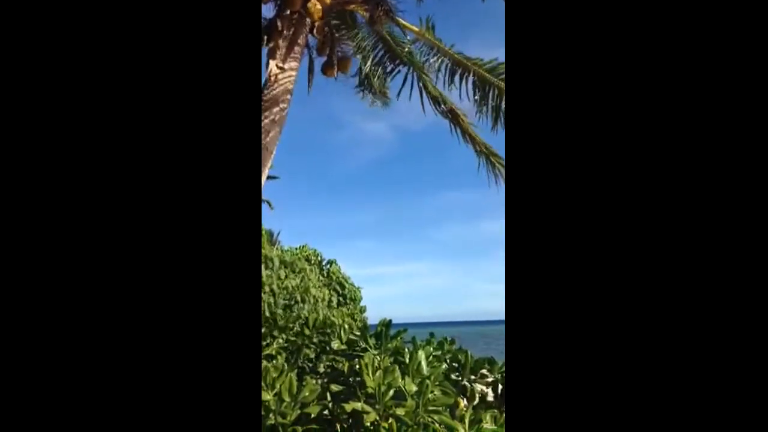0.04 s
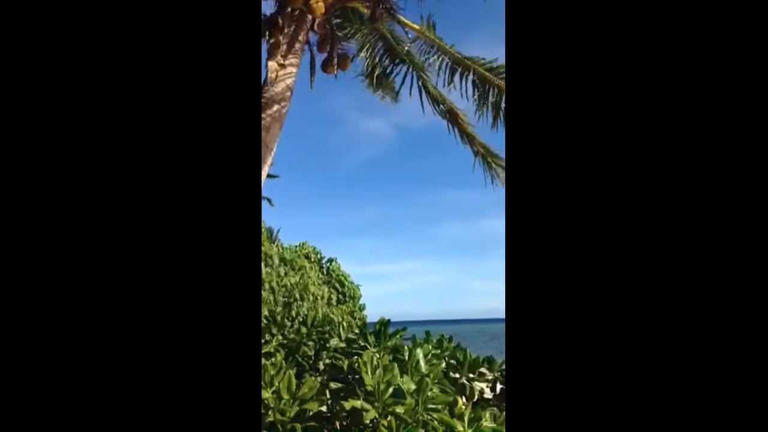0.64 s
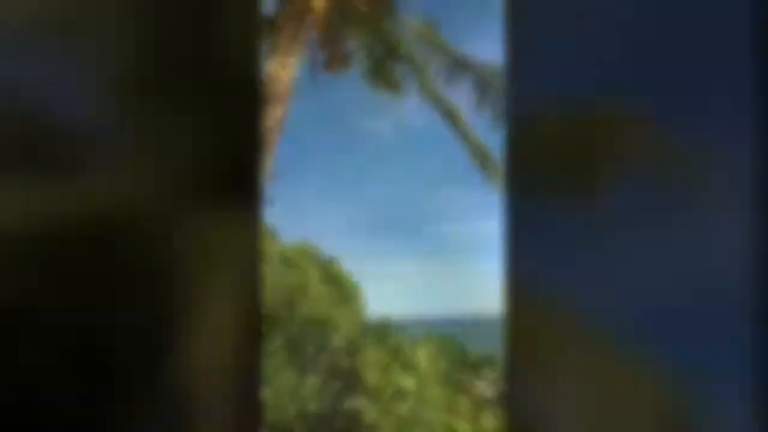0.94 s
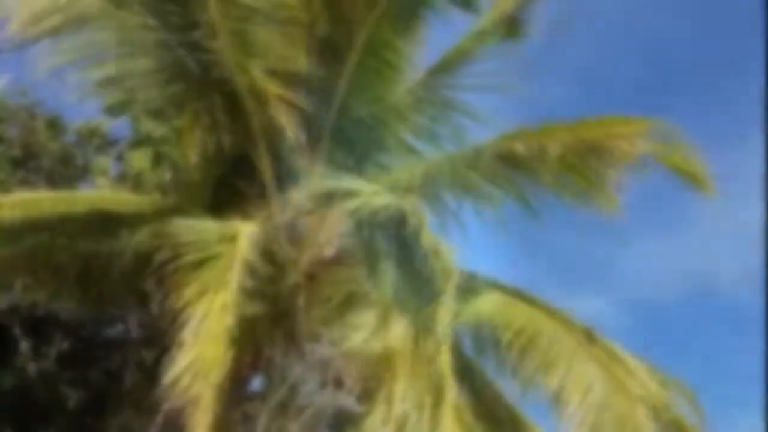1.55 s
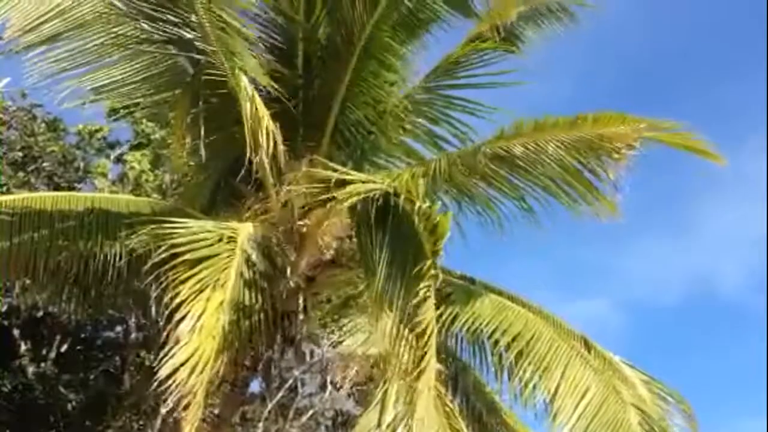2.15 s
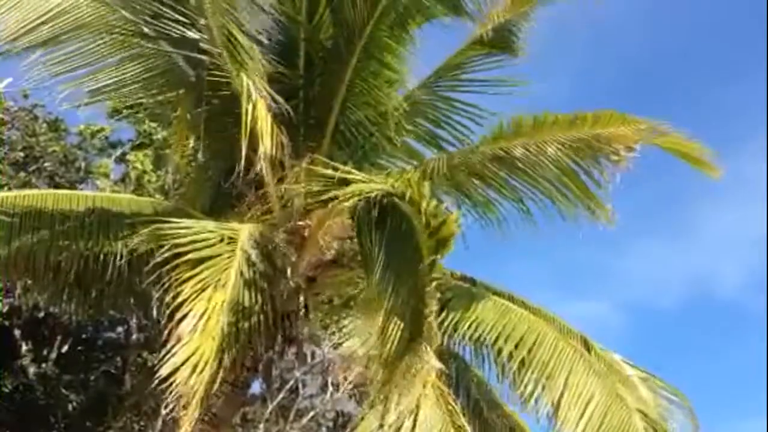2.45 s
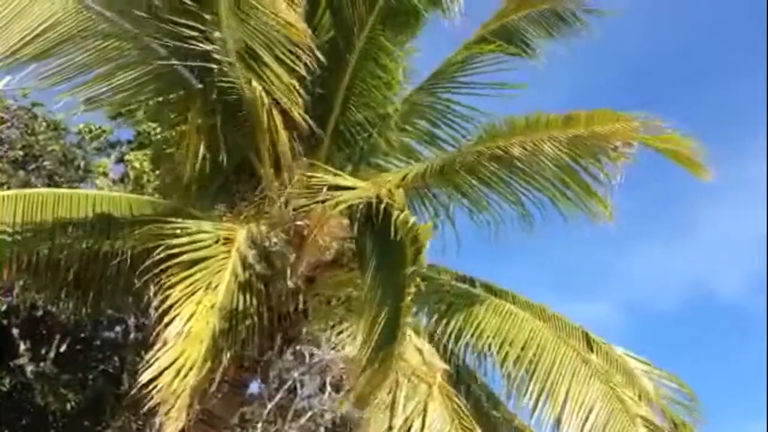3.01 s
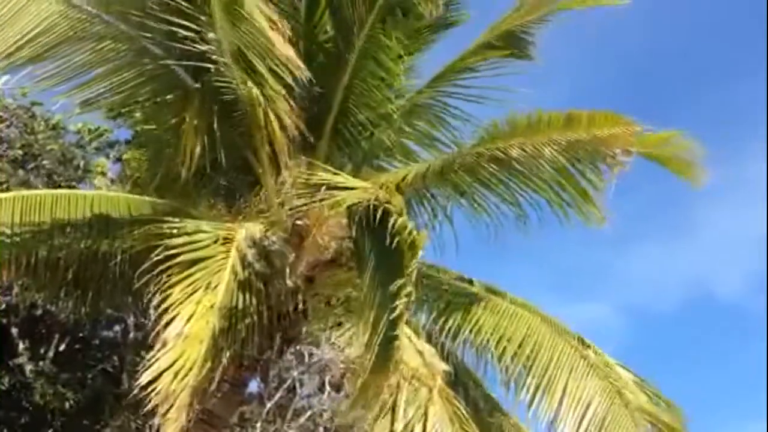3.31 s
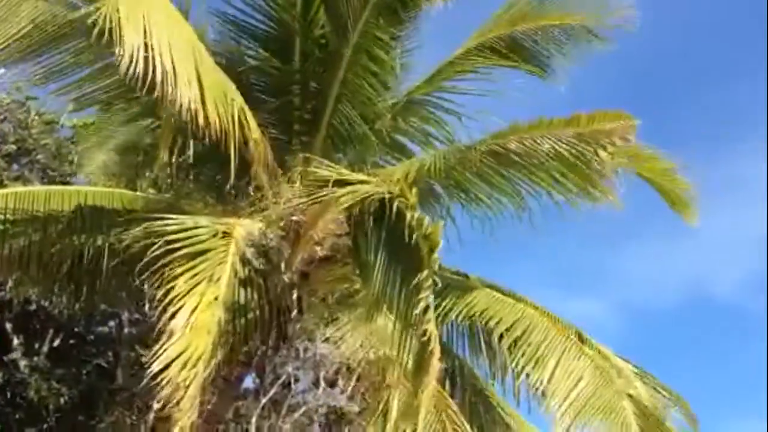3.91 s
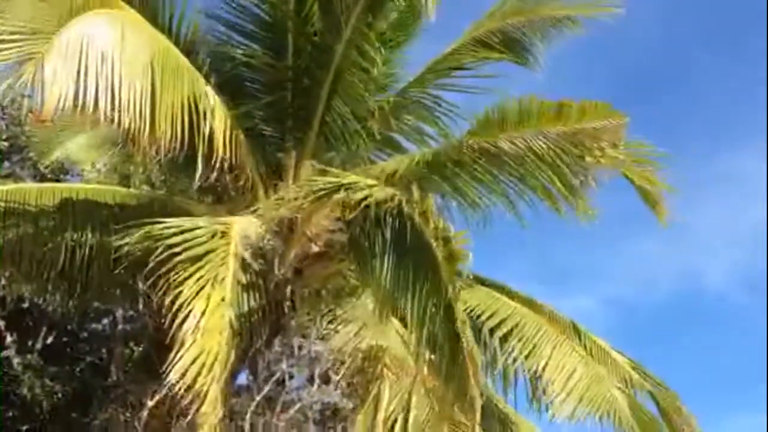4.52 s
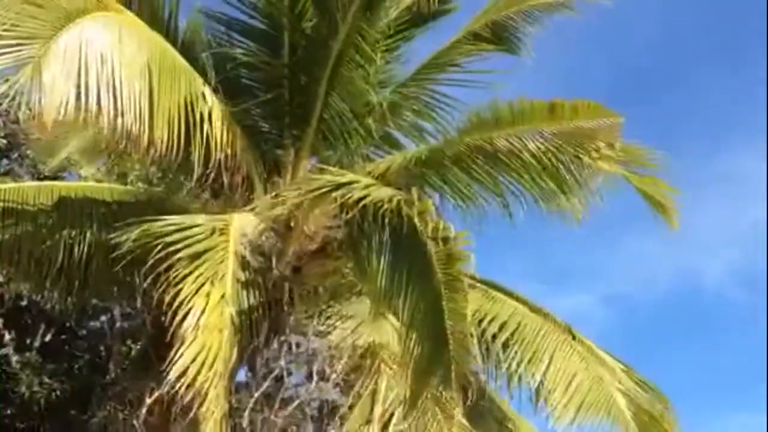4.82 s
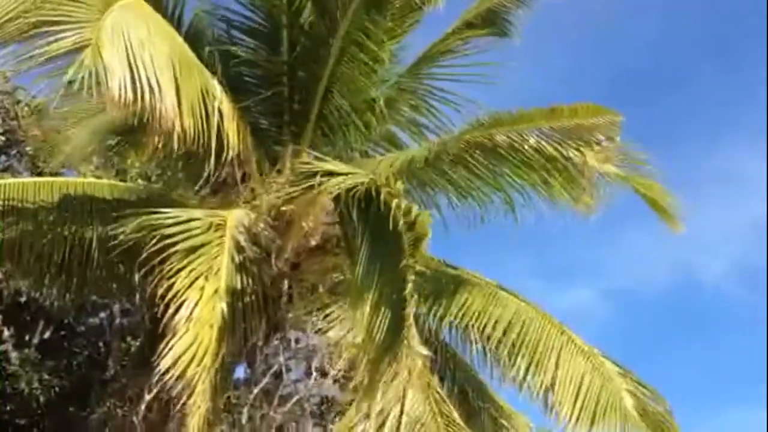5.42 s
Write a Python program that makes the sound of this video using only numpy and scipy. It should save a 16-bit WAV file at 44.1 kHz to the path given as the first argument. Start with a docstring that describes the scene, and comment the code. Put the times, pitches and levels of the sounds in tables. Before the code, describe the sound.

Wind rumbles and thumps on the microphone at a shore, over washing waves and lightly ticking palm leaves.

```python
"""Wind on a microphone at a tropical shore: eddies rumble throughout, and a gust hits hard near the end.
Each turbulent eddy that passes the port is heard as a fluctuation of pressure.
Behind the wind, a bright wash of waves and blown bushes fades into a quieter spot under a palm.
There distant surf roars softly, countless splashes summing to noise, while the fronds rustle
and their stiff leaflets tick together in brief impacts."""
import sys
import numpy as np
from scipy import signal
from scipy.fft import rfft, irfft, next_fast_len
from scipy.io import wavfile
from scipy.ndimage import uniform_filter1d

SR = 44100
rng = np.random.default_rng(int(sys.argv[2]) if len(sys.argv) > 2 else 0)


def unload_audio(sound):
    """Save the sound as a 16-bit wav file, at the path given as the first command line argument."""
    columns = np.transpose(np.atleast_2d(sound))
    # keep every value between -1 and 1, then stretch to whole-number steps
    steps = np.round(np.clip(columns, -1, 1) * 32767)
    wavfile.write(sys.argv[1], SR, steps.astype(np.int16))


N = 245195
TIME, FREQS = np.arange(N) / SR, np.fft.rfftfreq(N, 1 / SR)

# crossfade from the open shore to the palm: (time [s], shore gain [ratio], palm gain [ratio])
PLACE_GAINS = [(0, 1.11, 0.083), (.2, 1.16, 0.071), (.5, 1.19, 0.0058), (.8, 1.12, 0.98),
               (1.05, 0.84, 0.42), (1.3, 0.55, 0.62), (1.5, 0.036, 0.78), (5.56, 0.09, 0.7)]
# rustle of the fronds as the wind sways them: (time [s], level [dB])
FROND_SWAY = [(0, -87), (1.25, -63.5), (1.6, -72.5), (2.45, -70.5), (2.95, -66.5), (3.45, -63.3),
              (3.9, -72.5), (4.3, -68), (5.1, -72.5), (5.56, -74)]


def gain_of(db):
    """Amplitude ratio of a level in decibels."""
    return 10 ** (np.asarray(db) / 20)


def unit_rms(x):
    """Normalisation to an rms of 1."""
    return x / np.sqrt(np.mean(x ** 2) + 1e-30)


def level_at(spectrum, hz):
    """Linear interpolation of a spectrum on a logarithmic frequency axis."""
    frequencies, levels = np.transpose(spectrum)
    return np.interp(np.log(hz + 1), np.log(frequencies + 1), levels)


def curves(rows, t):
    """Linear interpolation of each column of a time table at the times t."""
    times, *columns = np.transpose(rows)
    return [np.interp(t, times, column) for column in columns]


def colour(x, spectrum):
    """Zero-phase filtering by multiplication in the frequency domain."""
    size = next_fast_len(N + 4096, real=True)
    response = gain_of(level_at(spectrum, np.fft.rfftfreq(size, 1 / SR)))
    return irfft(rfft(x, size) * response, size)[:N]


def wander(rate_hz, size=2048):
    """Random modulation: noise of rms 1, low-passed at the given rate."""
    hz = np.fft.rfftfreq(size, N / SR / size)
    slow = irfft(rfft(rng.standard_normal(size)) * (hz > 0) / (1 + (hz / rate_hz) ** 4))
    return unit_rms(np.interp(TIME, np.linspace(0, N / SR, size), slow))


def add(mix, start_s, sound):
    """Superposition of a sound on the mix from a given time."""
    part = mix[max(round(start_s * SR), 0):][:len(sound)]
    part += sound[:len(part)]


def wash(spectrum, roar_db, foam_db, split_hz=900, foam_hz=3500):
    """Incoherent summation: countless splashes merge into patchy noise, with a low roar and foam above."""
    # unevenness of the wash: (frequency [Hz], rms level deviation [dB])
    patch_depth = [(100, 3), (500, 1.5), (2000, 2.34), (5000, 2.1), (15000, -0.5)]
    hz, _, cells = signal.stft(rng.standard_normal(N), SR, nperseg=1024, noverlap=768)
    patches = uniform_filter1d(rng.standard_normal(cells.shape), size=5, axis=0)  # across frequency
    patches = unit_rms(uniform_filter1d(patches, size=7, axis=1))  # across time
    cells *= gain_of(level_at(spectrum, hz)[:, None] + level_at(patch_depth, hz)[:, None] * patches)
    noise = unit_rms(signal.istft(cells, SR, nperseg=1024, noverlap=768)[1][:N])
    roar = irfft(rfft(noise) / (1 + (FREQS / split_hz) ** 4), N)
    foam = irfft(rfft(noise - roar) * np.exp(-(FREQS / foam_hz) ** 2), N)
    return noise + roar * (gain_of(roar_db) - 1) + foam * (gain_of(foam_db) - 1)


def sea(shore_db=-47.5, surf_db=-56):
    """Broadband noise of breaking waves: the near, bright shore crossfades into dull, distant surf."""
    # wash on the open shore: (frequency [Hz], relative spectral density [dB])
    shore_spectrum = [(90, 3.5), (160, -13), (250, -1), (360, 0.5), (480, -4.5), (780, -8), (1100, -11.5),
                      (2300, -13), (3000, -12.5), (5000, -14), (8300, -20), (11500, -25), (15400, -30.5)]
    # distant surf under the palm: (frequency [Hz], relative spectral density [dB])
    surf_spectrum = [(90, -20), (160, -9), (300, -6), (410, -6), (500, -9), (700, -13.5), (950, -18.5),
                     (1500, -18.5), (2300, -20), (3000, -21), (4300, -22.5), (9300, -29), (15400, -32.5)]
    # swell of the distant breakers: (time [s], roar gain [dB], foam gain [dB])
    swell = [(0, -16, 0), (1.6, 6.5, 3), (2.2, 6, 2), (2.7, 6.5, 3), (3.3, 5, 5.5), (3.8, 7, 1.5),
             (4.1, 6, 3.5), (4.5, 3.5, 5.5), (4.9, 7, 5.5), (5.56, 4.5, 3.5)]
    shore_gain, palm_gain = curves(PLACE_GAINS, TIME)
    roar_db, foam_db = curves(swell, TIME)
    shore = wash(shore_spectrum, roar_db=0.42 * wander(8.9), foam_db=0.5 * wander(15))
    shore *= gain_of(0.22 * wander(40))
    surf = wash(surf_spectrum, roar_db, foam_db + 0.42 * wander(25))
    return gain_of(shore_db) * shore_gain * shore + gain_of(surf_db) * palm_gain * surf


def rustle(spectrum, flutter_db, ticks_per_s=1100, spread_db=3.5, bands=8):
    """Impact excitation: each random touch rings a leaf for a few cycles; far leaves blur into hiss."""
    t, ticks = np.arange(256) / SR, np.zeros(N)
    for hz in np.geomspace(1500, 13000, bands):
        touches = (rng.random(N) < ticks_per_s / bands / SR) * rng.choice([-1, 1], N)
        strengths = gain_of(spread_db * np.minimum(rng.exponential(1, N), 3.5))
        ring = np.exp(-t * hz / 1.3) * np.sin(2 * np.pi * hz * t) * hz ** 0.72
        ticks += signal.oaconvolve(touches * strengths, ring)[:N]
    leaves = colour(unit_rms(ticks) + rng.standard_normal(N), spectrum)
    return unit_rms(leaves * gain_of(flutter_db * wander(21)))


def bushes(level_db=-61):
    """Flow-induced flutter: bushes on the open shore rustle brightly and fade with it."""
    # bush leaves: (frequency [Hz], relative spectral density [dB])
    bush_spectrum = [(1500, -25), (3500, -6.5), (6000, 0), (8500, 0.5), (11000, -10.5), (15000, -10)]
    shore_gain, _ = curves(PLACE_GAINS, TIME)
    return gain_of(level_db) * shore_gain * rustle(bush_spectrum, flutter_db=4.5)


def fronds(swing_db=2.5, swing_hz=4):
    """Amplitude modulation: the palm's rustle swells and sinks as the wind bends its fronds."""
    # palm leaflets: (frequency [Hz], relative spectral density [dB])
    leaflet_spectrum = [(1200, -12), (2200, -9.5), (3000, 2.5), (3700, 2.5), (4600, -6), (6000, -6),
                        (9000, -13), (15000, -20)]
    sway_db, = curves(FROND_SWAY, TIME)
    return gain_of(sway_db + swing_db * wander(swing_hz)) * rustle(leaflet_spectrum, flutter_db=1.8)


def light_slaps(per_s=4.3, offset_db=-0.5, spread_db=5, low_hz=3300, high_hz=7000):
    """A random point process of leaflet impacts, whose levels follow the sway of the fronds."""
    when, strength, pitch = rng.random((round(per_s * N / SR), 3)).T
    times = when * N / SR
    sway_db, = curves(FROND_SWAY, times)
    levels = sway_db + offset_db + spread_db * (2 * strength - 1)
    return list(zip(times, levels, low_hz * (high_hz / low_hz) ** pitch))


def slaps(rise_s=0.002, decay_s=0.0096, half_width_octaves=0.4, size=4096):
    """Impact noise: a leaflet hits its neighbours in a short spray of contacts, filtered to its band."""
    # hardest slaps of stiff leaflets: (time [s], level [dB], centre frequency [Hz])
    hard_slaps = [(.122, -56, 11000), (.155, -49.5, 6500), (.224, -50.5, 5860), (.46, -54, 6000),
                  (1.258, -54.5, 6500), (2.606, -60, 4800), (2.9, -58, 3700), (3.044, -55.5, 3880),
                  (3.719, -55, 3830)]
    out, t, hz = np.zeros(N), np.arange(size) / SR, np.fft.rfftfreq(size, 1 / SR)
    envelope = (1 - np.exp(-t / rise_s)) * np.exp(-t / decay_s)
    for start_s, db, centre_hz in hard_slaps + light_slaps():
        contacts = rng.standard_normal(size) * (rng.random(size) < 0.15)
        band = 1 / (1 + (np.log2((hz + 1) / centre_hz) / half_width_octaves) ** 2)
        spray = unit_rms(irfft(rfft(contacts) * band))
        add(out, start_s, gain_of(db) * spray * envelope / envelope.max())
    return out


def breeze(lump_db=3, lump_hz=12):
    """Turbulent pressure fluctuation: light air flow makes a lumpy rumble at the microphone port."""
    # rumble of the air flow, with a long lull before the gust: (time [s], level [dB])
    flow_levels = [(0, -54.5), (.4, -54.5), (.88, -48.5), (1.1, -57.5), (1.9, -56.5), (2.4, -62),
                   (3.7, -62), (4.65, -59), (4.95, -44.5), (5.56, -51)]
    # turbulent pressure: (frequency [Hz], relative spectral density [dB])
    rumble_spectrum = [(15, -19), (30, -5), (55, -0.5), (80, -1.5), (130, -3), (200, -8), (320, -18.5),
                       (700, -35), (2000, -94)]
    level_db, = curves(flow_levels, TIME)
    lumps = gain_of(lump_db * wander(lump_hz))
    return gain_of(level_db) * unit_rms(colour(rng.standard_normal(N), rumble_spectrum) * lumps)


def eddy_spectrum(hz, eddy_hz, port_hz=760):
    """Spatial averaging: swirls smaller than the port cancel across it, so a broad hump loses treble."""
    ratio = hz / eddy_hz
    hump = ratio ** 0.86 * np.exp(-1.226 * ratio ** 1.086)
    return hump * np.exp(-(hz / port_hz) ** 2.3 / 2)


def wakes(strikes, delay_s=0.01595, offset_db=-11, spread_db=1, length_s=0.033, eddy_hz=89):
    """Wake formation: a weak, slow eddy trails each buffet."""
    jitter = rng.uniform(-0.92, 1, (len(strikes), 2))
    return [(s + delay_s * (1 + 0.29 * lag), db + offset_db + spread_db * strength, length_s, eddy_hz)
            for (s, db, _, _), (lag, strength) in zip(strikes, jitter)]


def buffets(overlap=1.87, kick_gain=0.51, sharpen_per_db=0.011, calm_db=-40, trim_db=-0.93, size=8192):
    """Pressure transients: each eddy is one kick amid uneven swings; small, fast eddies sound higher."""
    # eddies striking the microphone:
    # (middle time [s], level [dB], nominal duration [s], characteristic frequency [Hz])
    strikes = [(.589, -41, 0.029, 77), (.66, -42, 0.062, 80), (0.823, -34.5, 0.055, 135),
               (0.921, -37, 0.043, 110), (1.298, -47.5, 0.025, 105), (1.56, -46, 0.026, 101),
               (1.908, -44.5, 0.017, 126), (3.208, -49, .054, 134), (3.397, -42.5, .012, 136),
               (4.183, -28, 0.024, 124), (4.214, -27.5, 0.021, 215), (4.241, -25, .026, 127),
               (4.267, -20, 0.011, 288), (4.278, -18.5, 0.0089, 186), (4.293, -26.5, 0.015, 346),
               (4.479, -45, 0.033, 120), (4.566, -37, .028, 100), (4.735, -31.5, 0.03, 121),
               (4.899, -28.5, 0.019, 90), (4.991, -38.5, 0.047, 115), (5.033, -35, 0.014, 124),
               (5.101, -28, 0.027, 205), (5.209, -30, 0.031, 159), (5.257, -25, 0.014, 152),
               (5.288, -28.5, 0.033, 142), (5.348, -24, 0.031, 137), (5.408, -24.5, 0.025, 190),
               (5.539, -39, 0.022, 99)]
    out, t, hz = np.zeros(N), (np.arange(size) - size / 2) / SR, np.fft.rfftfreq(size, 1 / SR)
    for middle_s, db, length_s, eddy_hz in strikes + wakes(strikes):
        window = np.cos(np.pi * np.clip(t / (overlap * length_s), -0.5, 0.5)) ** 2
        # gentle eddies swing smoothly, in a narrower band; hard ones break up
        narrowing = 1 + np.clip(0.5 - (db - calm_db) / 25, 0, 1)
        random_phases = np.exp(2j * np.pi * rng.random(len(hz)))
        swirl = irfft(eddy_spectrum(hz, eddy_hz) ** narrowing * random_phases)
        # the kick's components arrive together; the harder the blow, the steeper its front
        kick_hz = eddy_hz * np.exp(sharpen_per_db * (db - calm_db))
        common_phase = np.exp(2j * np.pi * rng.random())
        kick = np.fft.fftshift(irfft(eddy_spectrum(hz, kick_hz) ** narrowing * common_phase))
        eddy = unit_rms(window * swirl) + kick_gain * unit_rms(window * kick)
        eddy *= np.sqrt(length_s * SR / np.sum(eddy ** 2))  # energy in proportion to duration
        add(out, middle_s + t[0], gain_of(db + trim_db) * eddy)
    return out


def scene():
    """Superposition of sea, leaves and wind at one microphone."""
    return (sea() + bushes() + fronds() + slaps() + breeze() + buffets())[None]


def record(dry, cutoff_hz=15480):
    """Frequency response: the microphone has a shallow notch and sheds the deepest bass and top treble."""
    # microphone response: (frequency [Hz], gain [dB])
    mic_response = [(10, -18), (28, -13.5), (50, 1.5), (2300, -0.5), (2480, -1), (2700, -5), (3050, -4.5),
                    (3350, -2.5), (4000, -1.5), (16000, 0)]
    low_pass = signal.firwin(1023, cutoff_hz, window=("kaiser", 9), fs=SR)
    return signal.oaconvolve(colour(dry[0], mic_response), low_pass, "same")[None]


dry = scene()
out = record(dry)
unload_audio(out)
```